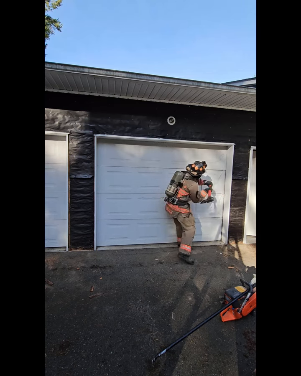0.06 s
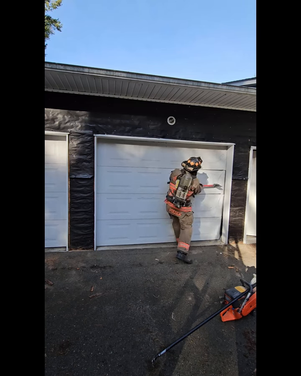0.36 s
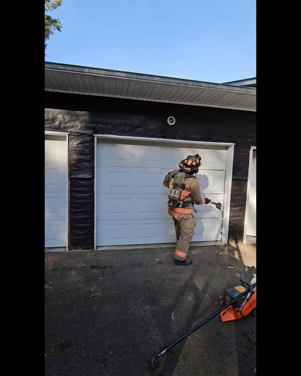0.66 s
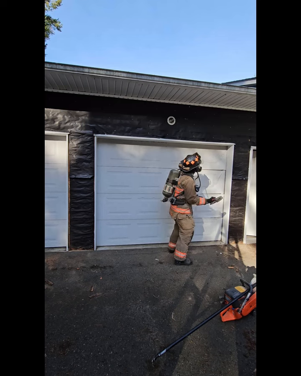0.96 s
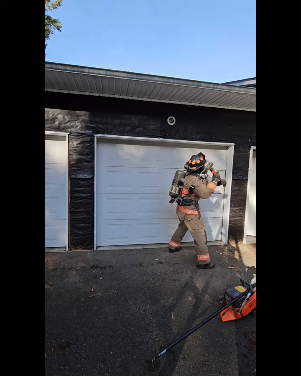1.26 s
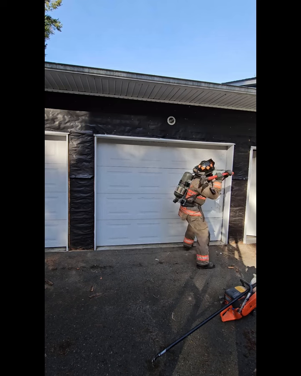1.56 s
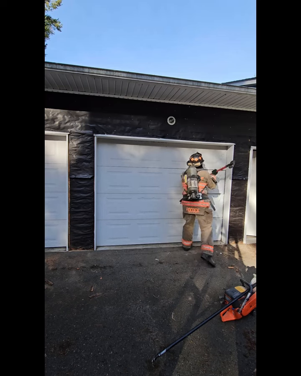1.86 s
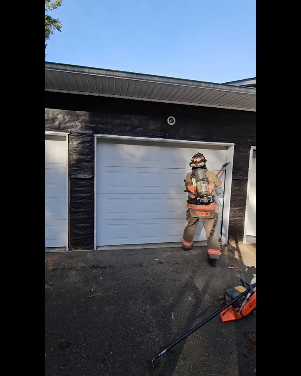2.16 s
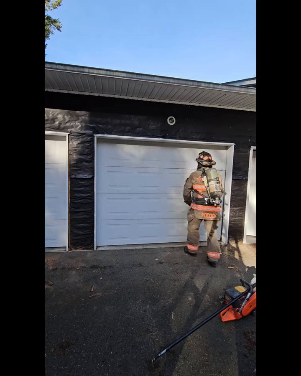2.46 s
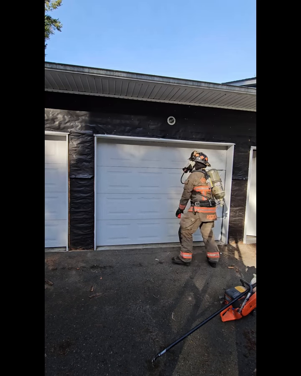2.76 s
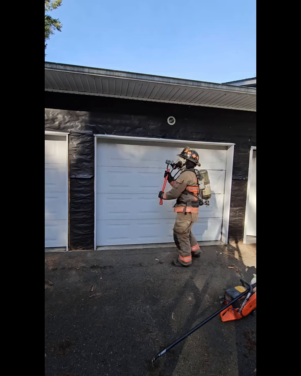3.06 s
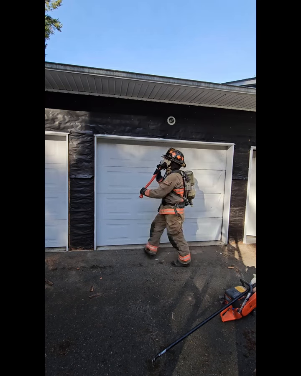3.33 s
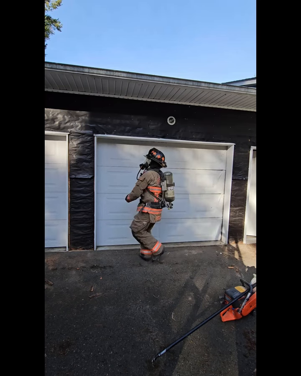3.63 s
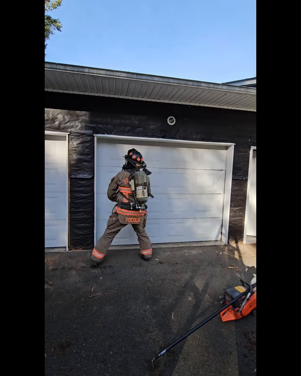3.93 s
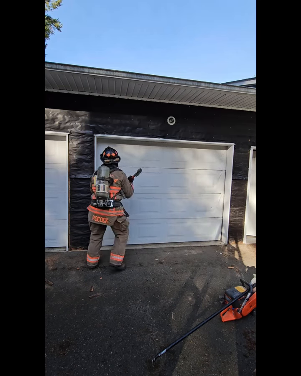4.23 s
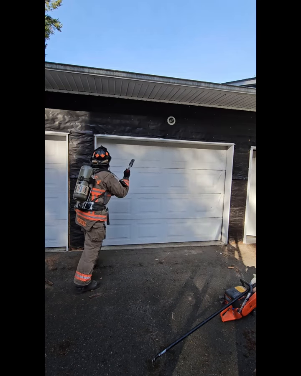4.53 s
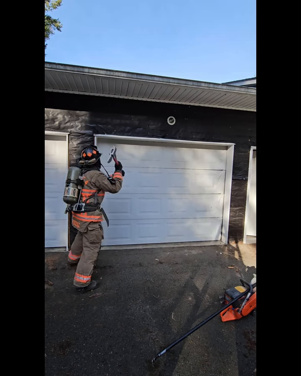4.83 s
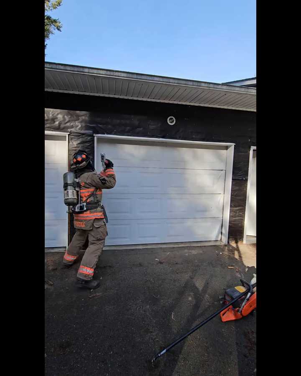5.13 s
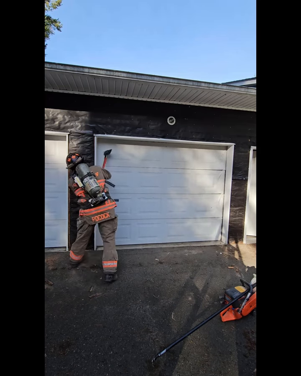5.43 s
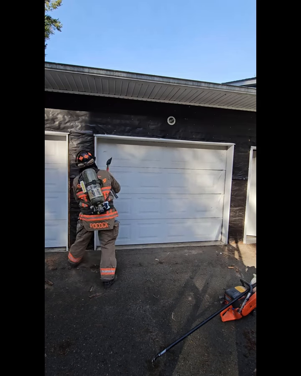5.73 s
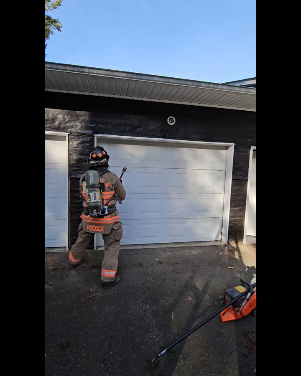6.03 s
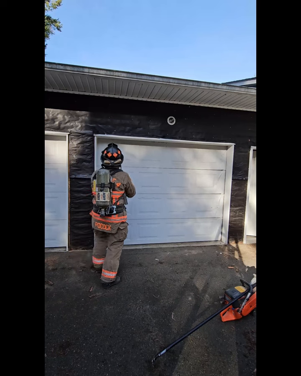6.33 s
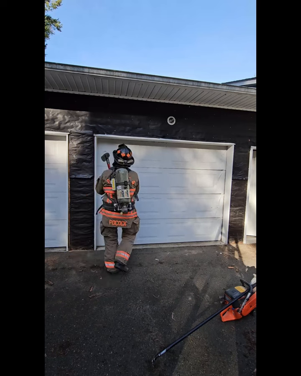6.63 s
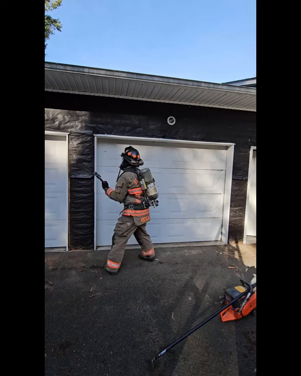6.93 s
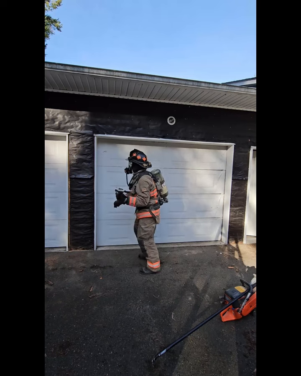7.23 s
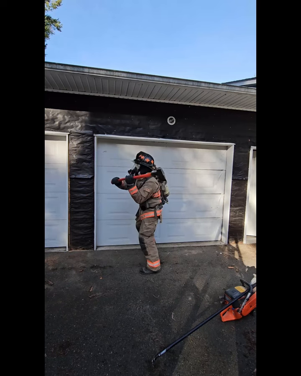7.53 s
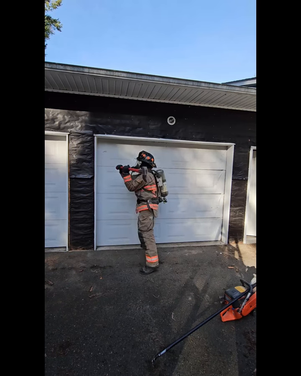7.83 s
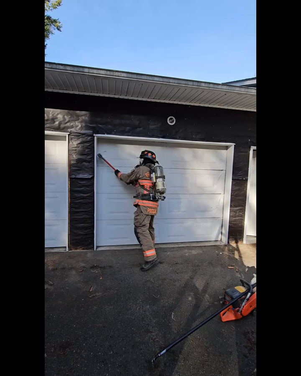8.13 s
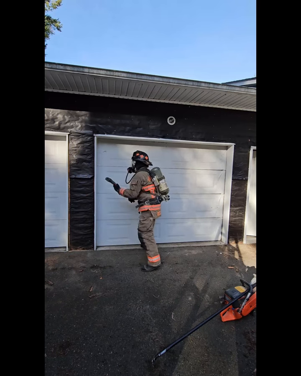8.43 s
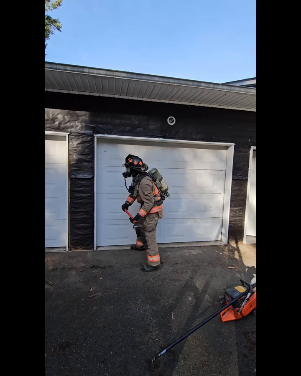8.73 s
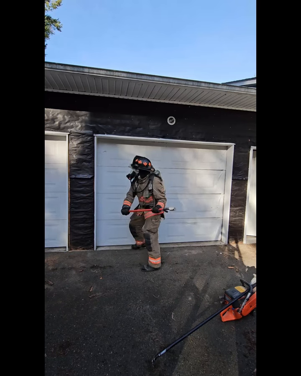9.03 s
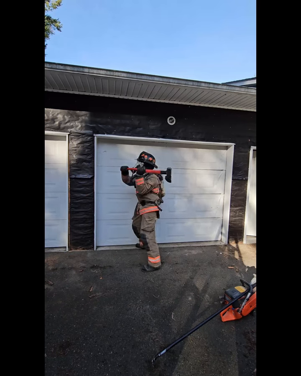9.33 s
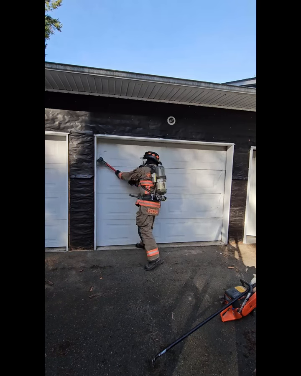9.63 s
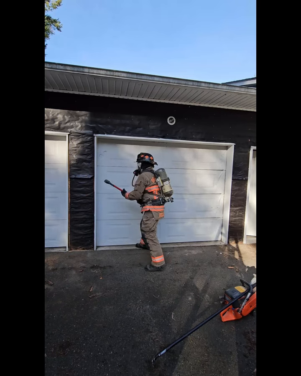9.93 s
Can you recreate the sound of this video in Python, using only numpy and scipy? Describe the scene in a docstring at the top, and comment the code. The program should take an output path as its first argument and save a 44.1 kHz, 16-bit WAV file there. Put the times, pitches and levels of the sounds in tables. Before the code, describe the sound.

Outdoors on a driveway, heard in stereo from a few metres, two loud axe blows crash into a sheet metal garage door, which shudders, booms and knocks against its frame. Quiet boot steps, rustling cloth and clinking buckles follow, then a softer third blow. After more steps, two hard strikes land close together, each leaving hinges and rollers rattling. Distant traffic hums faintly underneath.

```python
"""An axe strikes a hollow sectional garage door five times, a few metres from a stereo microphone
on the driveway. Each blow dents the sheet panel, shakes hinges and tracks, and makes the garage boom;
the door thuds back against its frame and loose metal knocks. Between blows, boots step on asphalt
and heavy gear rustles and clinks. Traffic hums far away."""
import sys
import numpy as np
from scipy import signal
from scipy.fft import rfft, irfft, next_fast_len
from scipy.io import wavfile

SR = 44100
rng = np.random.default_rng(int(sys.argv[2]) if len(sys.argv) > 2 else 0)


def master(y):
    """Save y as 16-bit WAV."""
    cut = np.clip(np.atleast_2d(y).T, -1, 1)
    pcm = np.round(cut * 32767)  # scale
    wavfile.write(sys.argv[1], SR, pcm.astype(np.int16))


N = 440118
T = np.arange(int(1.1 * SR)) / SR  # time axis of a long sound, s
BRIEF = int(.45 * SR)  # samples in a short sound

# axe blows: t/s, force/dB, nominal panel f/Hz, panel level/dB, second push/dB, struck spot f/Hz,
# smack level/dB, clank level/dB, left minus right/dB
BLOWS = [(0.2814, 0.5, 304.4, -16.5, -24, 790, -12, -21.5, 1),
         (1.995, -1.5, 271, -7.5, -24.5, 880, -20.5, -17.5, 1),
         (5.3992, -6, 254.4, -6.5, -26, 510, -15, -30, -1.5),
         (8.0789, 1, 225, -8, -1.5, 460, -11.5, -23, -1), (9.640, .5, 277, -10, -4, 730, -15.5, -24, 0)]
# heels and soles on asphalt: t/s, level/dB, f/Hz
STEPS = [(1.304, -29, 180), (1.532, -35, 149), (2.878, -40, 194), (3.447, -38.5, 247), (3.752, -47.5, 258),
         (4.009, -28.5, 211), (4.437, -26.5, 263), (6.442, -37, 198), (6.511, -40, 218),
         (6.919, -32.5, 239), (7.186, -28, 244), (7.264, -31, 175), (7.691, -36.5, 197), (8.633, -33, 192),
         (9.182, -33.5, 150)]
# buckles and tool clinking: t/s, level/dB, brightness/(dB per octave)
CLINKS = [(1.400, -55, 1), (1.490, -60, 1.5), (1.537, -62, -0.5), (1.726, -58, -0.5), (3.044, -58, 2.5),
          (3.452, -59, -1.5), (4.115, -54, -1.2), (4.146, -56.5, -0.5), (4.459, -53, 0.5),
          (4.617, -51, 1.5), (5.111, -43.5, 2), (6.443, -58.5, 0), (7.070, -49, 0), (7.200, -46, 0),
          (7.878, -41.5, 0.5)]
# low resonances of the door's sheet: f/Hz, bandwidth/Hz, level/dB
SMACK_MODES = [(362, 44, -1.5), (478, 76, -0.5), (550, 50, 4), (670, 120, -10), (755, 190, -7)]
# stereo width at the microphone: f/Hz, side minus mid/dB
WIDTH = [(40, -22), (130, -16.5), (260, -13), (500, -11.5), (1000, -5.5), (2000, -1), (4000, 0.5),
         (12000, -1.5)]


def amp(db):
    """Decibels to gain."""
    return 10 ** (np.asarray(db) / 20)


def unit(x):
    """Scale to rms 1."""
    return x / np.sqrt(np.mean(x ** 2) + 1e-20)


def along(points, hz):
    """Read (f/Hz, value) points on a log frequency axis."""
    freqs, values = np.transpose(points)
    return np.interp(np.log(hz + 1), np.log(freqs + 1), values)


def filtered(x, response):
    """Pass x through a frequency response."""
    size = x.shape[-1]
    padded = next_fast_len(size + 4096, True)
    return irfft(rfft(x, padded) * response(np.fft.rfftfreq(padded, 1 / SR)), padded)[..., :size]


def shape(points):
    """The response of a dB spectrum."""
    return lambda hz: amp(along(points, hz))


def resonances(modes):
    """The response of a few damped modes of alternating sign."""
    return lambda hz: sum((-1) ** k * amp(db) * 1j * hz * width / (centre**2 - hz**2 + 1j * hz * width)
                          for k, (centre, width, db) in enumerate(modes))


def modal(response, spacing_hz, depth_db):
    """A response broken into many close peaks, as in thin metal."""
    peaks = rng.standard_normal(2048)
    return lambda hz: response(hz) * amp(depth_db * np.interp(hz / spacing_hz, np.arange(2048), peaks))


def noise(response, size=len(T)):
    """Coloured stereo noise of rms 1, alike in the bass and diffuse in the treble."""
    def mid_side(hz):
        angle = np.arctan(amp(along(WIDTH, hz)))
        return response(hz) * [np.cos(angle), np.sin(angle)]
    mid, side = filtered(rng.standard_normal((2, size)), mid_side)
    return unit(np.array([mid + side, mid - side]))


def flutter(rate, depth_db, size=len(T)):
    """A random gain of rms 1 that moves rate times a second."""
    knots = rng.standard_normal(int(size * rate / SR) + 2)
    return unit(amp(depth_db * np.interp(np.arange(size) * rate / SR, np.arange(len(knots)), knots)))


def grains(rate, spread_db, size=len(T)):
    """A gain of rms 1 made of tiny ticks of unequal size, about rate a second."""
    strengths = amp(spread_db * np.minimum(rng.standard_exponential(size), 4))
    ticks = (rng.random(size) < rate / SR) * strengths ** 2
    power = signal.lfilter([1], [1, -np.exp(-1 / (.0012 * SR))], ticks)
    return unit(np.sqrt(power))


def fade(t60, attack, size=len(T)):
    """A quick rise and an exponential decay of 60 dB in t60 seconds."""
    t = T[:size]
    return np.exp(-np.log(1000) * t / t60) * (1 - np.exp(-t / attack))


def swell(middle_s, half_s):
    """A bell-shaped rise and fall."""
    return np.exp(-((T[:BRIEF] - middle_s) / half_s) ** 2)


def ring(hz, scatter_db):
    """One undamped mode at a random strength and phase."""
    return amp(scatter_db * rng.standard_normal()) * np.sin(2 * np.pi * (hz * T + rng.random()))


def add(track, s, sound):
    """Mix a sound into the track at time s."""
    start = round(s * SR)
    track[:, start:start + sound.shape[-1]] += sound[..., :N - start]


def street():
    """Far from the driveway, tyres swell and fade over a low rumble and a faint hiss."""
    # spectra of the rumble, the hiss and the tyres: f/Hz, level/dB
    rumble_spectrum = [(20, -14.5), (40, -9.5), (60, 3.5), (85, -6), (125, -9), (170, -17), (260, -15),
                       (400, -29), (1000, -52)]
    hiss_spectrum = [(300, -21), (1800, 1), (3500, 1.5), (7500, -1), (10000, -8), (16000, -8)]
    tyre_spectrum = [(100, -6), (300, -6.5), (550, -0.5), (850, 1), (1250, 0), (2000, -7), (3000, -16),
                     (5000, -28.5), (16000, -45)]
    # passing traffic: t/s, level/dB
    traffic_levels = [(0, -64.5), (1.5, -66), (3, -67.5), (3.8, -65.5), (4.8, -61), (5.6, -56.5),
                      (6.5, -66.5), (7.5, -58.5), (8.8, -62.5), (10, -57)]
    rumble = amp(-56) * noise(shape(rumble_spectrum), N) * flutter(rate=3.4, depth_db=3.5, size=N)
    hiss = amp(-80.5) * noise(shape(hiss_spectrum), N)
    traffic_db = np.interp(np.arange(N) / SR, *np.transpose(traffic_levels))
    return rumble + hiss + amp(traffic_db) * noise(shape(tyre_spectrum), N)


def clothing():
    """Heavy cloth crackles with every swing, stride, clink and shift of stance."""
    # the coat as the axe lifts, strikes and recovers: t/s from the blow, level/dB, half length/s
    swing_moves = [(-.215, -67.5, 0.041), (-.065, -62, 0.036), (.60, -66, .055)]
    # shifts of stance between swings: t/s at the middle, level/dB, half length/s
    stance_shifts = [(3.737, -72.5, 0.047), (4.76, -70.5, .09), (5.005, -73.5, .06), (5.256, -73, 0.06),
                     (6.237, -73, .03), (6.702, -69, .04), (7.528, -68, .08), (8.903, -73, 0.1)]
    # rubbing cloth: f/Hz, level/dB
    cloth_spectrum = [(300, -21), (1800, 4), (3500, 1.5), (7500, -0.5), (10000, -7), (16000, -6.5)]
    coat = [(blow[0] + lag, db, half) for blow in BLOWS for lag, db, half in swing_moves]
    trousers = [(s + .091, db - 40.5, .058) for s, db, _ in STEPS]
    jostles = [(s, db - 18.5, .046) for s, db, _ in CLINKS]
    t = np.arange(N) / SR
    power = sum(amp(db) ** 2 * np.exp(-2 * np.minimum(np.abs(t - s) / half, 10) ** 2)
                for s, db, half in coat + trousers + jostles + stance_shifts)
    crackle = noise(shape(cloth_spectrum), N) * grains(rate=1100, spread_db=3, size=N)
    return amp(2.5) * np.sqrt(power) * crackle


def contact(t60, ring_hz, ring_db, tilt_db, tick_db, tail_db):
    """A small metal contact: a tick and a short chatter, coloured by the part that rings."""
    # small metal parts: f/Hz, level/dB
    metal_spectrum = [(150, -19), (600, 4), (1200, 1.5), (2100, -0.5), (2900, -3.5), (5000, -5), (8000, -5),
                      (10300, -14), (12000, -9), (16000, -22.5)]

    def colour(hz):
        slope_db = tilt_db * np.log2(hz / ring_hz + .1)
        peak_db = ring_db / (1 + ((hz / ring_hz - 1) / .23) ** 2)
        return amp(along(metal_spectrum, hz) + slope_db + peak_db)
    # the shorter the contact, the harder its tick
    tick = amp(tick_db) * np.sqrt(.12 / t60) * swell(.0016, .0029)
    tail = amp(tail_db) * fade(t60, attack=.0071, size=BRIEF)
    tail *= grains(rate=3500, spread_db=1.5, size=BRIEF)
    return noise(modal(colour, spacing_hz=91.3, depth_db=4), BRIEF) * (tick + tail)


def knocks():
    """Loose hinges and rollers knock against their tracks; once, at 1.31 s, the tool knocks against the door."""
    # knocks on the door: t/s, level/dB, t60/s, ring/dB
    door_knocks = [(0.225, -42.5, 0.71, 0), (0.445, -35.5, .18, -12), (0.499, -35.5, 0.14, -5),
                   (0.592, -29.5, 0.29, -1), (1.041, -54, .15, 12), (1.313, -46, 0.16, 13),
                   (2.125, -35.5, 0.33, -15), (2.351, -34.5, 0.13, 11), (2.484, -49.5, 0.12, 17),
                   (5.976, -52, 0.1, 16), (8.186, -30, .12, 1), (9.742, -27, 0.14, -6)]
    out = np.zeros((2, N))
    for s, db, t60, ring_db in door_knocks:
        knock = contact(t60, ring_hz=1930, ring_db=ring_db, tilt_db=-.5, tick_db=2, tail_db=1)
        add(out, s, amp(db) * knock)
    return out


def bending_wave(end_hz, excess, fall_s):
    """Higher frequencies travel faster through the sheet, so the pitch falls towards end_hz."""
    hz = end_hz * (1 + excess * np.exp(-T[:BRIEF] / fall_s))
    return np.sin(2 * np.pi * np.cumsum(hz) / SR)


def dent(pitch_hz, panel_db, second_db):
    """The sheet is pushed twice and swings; the wave returns from the far edge as a falling chirp."""
    push = -.7 * swell(.0009, .00044) - amp(second_db) * swell(.0142, .0005)
    swing = bending_wave(.93 * pitch_hz, excess=.12, fall_s=.025)
    swing *= fade(t60=.11, attack=.0026, size=BRIEF)
    chirp = bending_wave(.62 * pitch_hz, excess=3.5, fall_s=.04) * swell(.097, .023)
    left = push + amp(panel_db) * (swing + amp(-19) * chirp)
    right = filtered(left, lambda hz: np.exp(-2j * np.pi * hz * .00018))  # arrives 0.18 ms later
    return np.array([left, right])


def struck_sheet(spot_hz, smack_db, clank_db, force_db, crash_spectrum):
    """The head bites for a few milliseconds; the sheet rings with a smack, a clank and a crash."""
    # high resonances of the sheet: f/Hz, bandwidth/Hz, level/dB
    clank_modes = [(980, 180, -10), (1190, 100, 0), (1333, 80, 1), (1696, 43, 2.5), (1930, 120, -5.5),
                   (2280, 42, -7.5)]
    spot_mode = (spot_hz, 110, 2.5)  # every spot on the sheet has a resonance of its own
    smack = amp(smack_db) * noise(resonances(SMACK_MODES + [spot_mode]), BRIEF)
    clank = amp(clank_db) * noise(resonances(clank_modes), BRIEF)
    crash = noise(modal(shape(crash_spectrum), spacing_hz=71, depth_db=4), BRIEF)
    crash *= amp(force_db - 26.5) * flutter(rate=500, depth_db=2.5, size=BRIEF)
    bite = (amp(-1) * smack + amp(4) * clank) * swell(.0036, .0022)
    bite += amp(4) * crash * swell(.0046, .0016)
    return (bite + smack * fade(t60=.15, attack=.0004, size=BRIEF)
            + clank * fade(t60=.13, attack=.00086, size=BRIEF)
            + amp(2) * crash * fade(t60=.36, attack=.0015, size=BRIEF))


def door_rattle(chatter_spectrum):
    """The shock spreads through the sections: hinges and rollers chatter, and the steel rings on."""
    # shaken door sections: f/Hz, level/dB
    section_spectrum = [(30, 10.5), (130, 15.5), (260, 16), (340, 9.5), (540, 7.5), (900, 3), (2000, 1),
                        (2700, -3.5), (5000, -9), (8500, -13), (10400, -17.5), (11600, -16), (13000, -20),
                        (16000, -25)]
    # modes of tracks and hinges: f/Hz, level/dB
    steel_modes = [(1276, 9.5), (1710, -1), (2064, 1), (2800, 1), (4220, -2.5), (4420, -3), (5249, -4.5),
                   (5385, -3), (7246, -1), (7467, -7.5), (8199, -7.5), (11493, -6), (11750, -8)]
    sections = noise(modal(shape(section_spectrum), spacing_hz=35, depth_db=2.2))
    sections *= flutter(rate=97, depth_db=1) * fade(t60=.86, attack=.0071)
    chatter = noise(shape(chatter_spectrum)) * grains(rate=130, spread_db=3) * fade(t60=.43, attack=.015)
    steel = np.array([sum(amp(db) * ring(hz, scatter_db=1.5) for hz, db in steel_modes)
                      for _ in range(2)])
    steel *= flutter(rate=60, depth_db=4) * fade(t60=.85, attack=.004)
    return sections + amp(-15.5) * chatter + amp(-31) * steel


def garage_boom():
    """The garage behind booms, throbbing as the door shudders on its rollers."""
    # modes of the garage's air and the whole door: f/Hz, level/dB, t60/s
    garage_modes = [(38.5, -6.5, 1.7), (53.2, -.5, 1.2), (62.05, -1.5, 1.3), (75.6, -4, .9),
                    (85.4, -7, 1.6), (109.7, -4.5, 1), (128.8, -4, 1.0), (154, -10, 0.98),
                    (186.5, -13.5, 1.1), (221, -8, 1), (270, -10, 0.5)]
    mid, side = sum(amp(db) * np.array([ring(hz, scatter_db=2.5), ring(hz, scatter_db=2)])
                    * fade(t60, attack=.02) for hz, db, t60 in garage_modes)
    return (mid + amp(-19) * np.outer([1, -1], side)) * flutter(rate=28, depth_db=3)


def axe():
    """Each blow dents and rings the sheet, rattles the door and sets the garage booming."""
    # crashing sheet and chattering hinges: f/Hz, level/dB
    crash_spectrum = [(300, -29), (1000, -4.5), (2000, -2), (2700, -2), (4000, -2), (5000, -0.5),
                      (8000, -5), (10300, -12), (11500, -7), (13000, -11), (16000, -9)]
    rattle_growth, boom_growth = .15, .45  # dB per dB of force
    out = np.zeros((2, N))
    for s, force_db, pitch_hz, panel_db, second_db, spot_hz, smack_db, clank_db, pan_db in BLOWS:
        sheet = struck_sheet(spot_hz, smack_db, clank_db, force_db, crash_spectrum)
        pan = amp([[pan_db / 2], [-pan_db / 2]])
        add(out, s, pan * (dent(pitch_hz, panel_db, second_db) + sheet))
        add(out, s, amp(-21.5 + rattle_growth * force_db) * door_rattle(crash_spectrum))
        add(out, s, amp(-21.5 + boom_growth * force_db) * garage_boom())
    return out


def rebounds():
    """The swinging door thuds against its frame, bounces more softly and once scrapes along it."""
    # the door meets its frame: t/s, level/dB
    frame_hits = [(0.495, -21.5), (2.196, -21.5), (5.535, -29.5), (9.745, -22.5)]
    # thud of the frame: f/Hz, level/dB
    frame_spectrum = [(25, -25), (60, 1), (130, 2.5), (240, -3), (340, -14), (600, -24.5), (1500, -28.5),
                      (5000, -40)]
    bounce_s, bounce_loss_db, scrape_at_s = .15, 13, .76
    out = np.zeros((2, N))
    for s, db in frame_hits:
        for bounce in range(2):
            thud = noise(shape(frame_spectrum), BRIEF) * fade(t60=.5, attack=.0053, size=BRIEF)
            add(out, s + bounce * bounce_s, amp(db - bounce * bounce_loss_db) * thud)
    scrape = noise(resonances(SMACK_MODES), BRIEF) * grains(rate=1400, spread_db=5, size=BRIEF)
    add(out, scrape_at_s, amp(-50.5) * scrape * swell(.099, .1))
    return out


def boots():
    """Each step on the asphalt is a dull thump of a few cycles and a puff under the sole."""
    # puff under the sole: f/Hz, level/dB
    sole_spectrum = [(40, -28), (130, -0.5), (250, -2), (450, -7.5), (700, -19), (2000, -30.5), (6000, -51)]
    out = np.zeros((2, N))
    for s, db, pitch_hz in STEPS:
        thump = amp(-5.5) * np.sin(2 * np.pi * pitch_hz * T[:BRIEF]) * swell(.0072, .0045)
        puff = amp(-7.5) * fade(t60=.075, attack=.0044, size=BRIEF)
        tail = amp(-19.5) * fade(t60=.31, attack=.012, size=BRIEF)
        add(out, s, amp(db) * (thump + (puff + tail) * noise(shape(sole_spectrum), BRIEF)))
    return out


def clinks():
    """Gear clinks: heavy parts ring, small ones give a bright, dry tick that stops sooner."""
    out = np.zeros((2, N))
    for s, db, brightness in CLINKS:
        clink = contact(t60=.22 * 2 ** (-.18 * brightness), ring_hz=1980, ring_db=7.5 - 4.5 * brightness,
                        tilt_db=brightness, tick_db=5.5 + brightness, tail_db=3)
        add(out, s, amp(db) * clink)
    return out


def scene():
    """Door, worker and street from the driveway; the microphone's left side hears more treble."""
    # balance at the microphone: f/Hz, left minus right/dB
    balance = [(200, 0), (2000, -.5), (4000, 1), (9000, 3.8)]
    door = axe() + rebounds() + knocks()
    worker = boots() + clothing() + clinks()
    return filtered(door + worker + street(), lambda hz: amp(np.outer([.5, -.5], along(balance, hz))))


def record(dry):
    """The recorder rounds off peaks at full scale and keeps nothing above its band limit."""
    top_hz, edge_hz = 16000, 400
    rounded = dry / (1 + np.abs(dry) ** 8) ** (1 / 8)
    return filtered(rounded, lambda hz: np.clip((top_hz - hz) / edge_hz + .5, 0, 1))


dry = scene()
out = record(dry)
master(out)
```